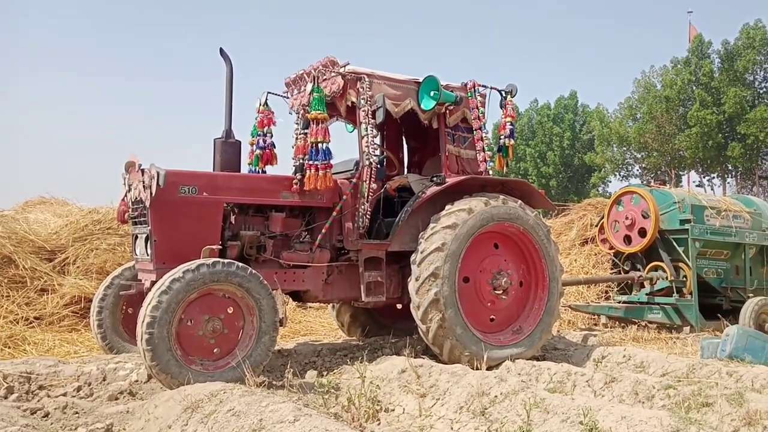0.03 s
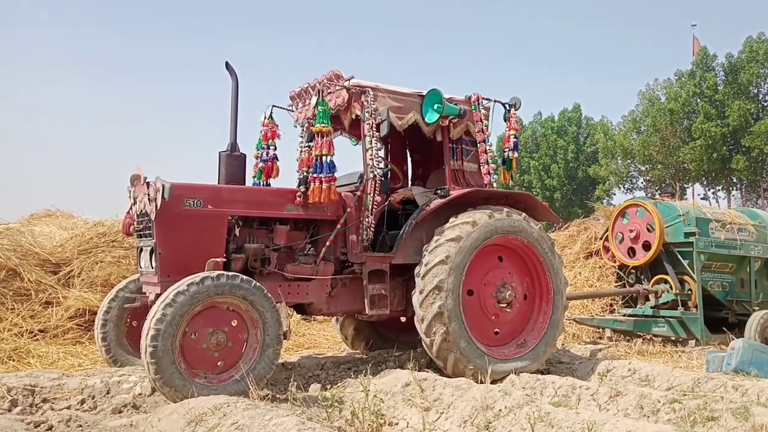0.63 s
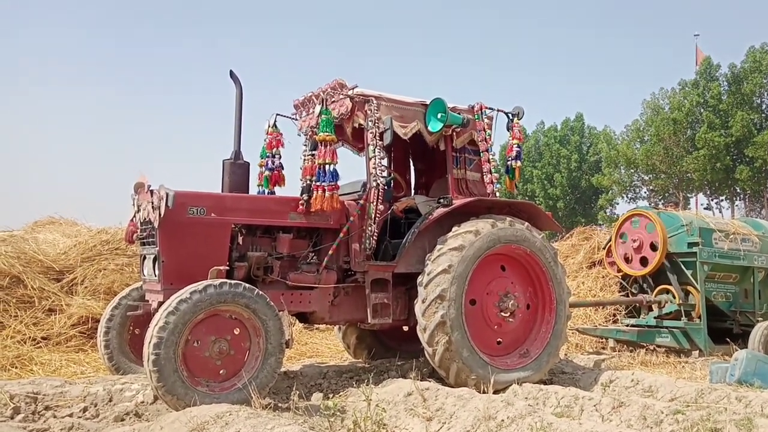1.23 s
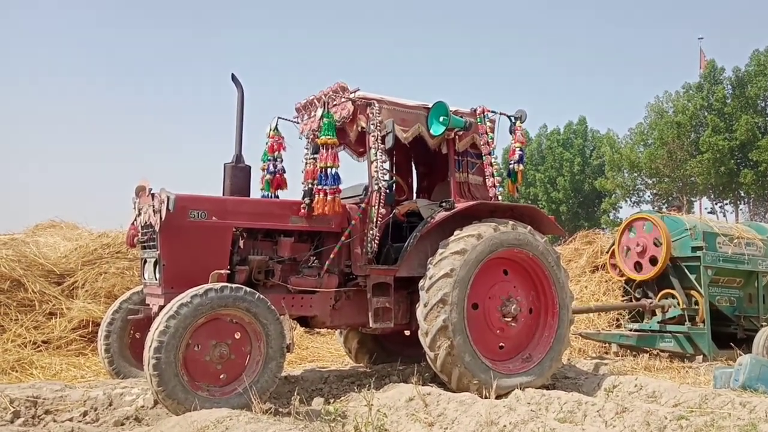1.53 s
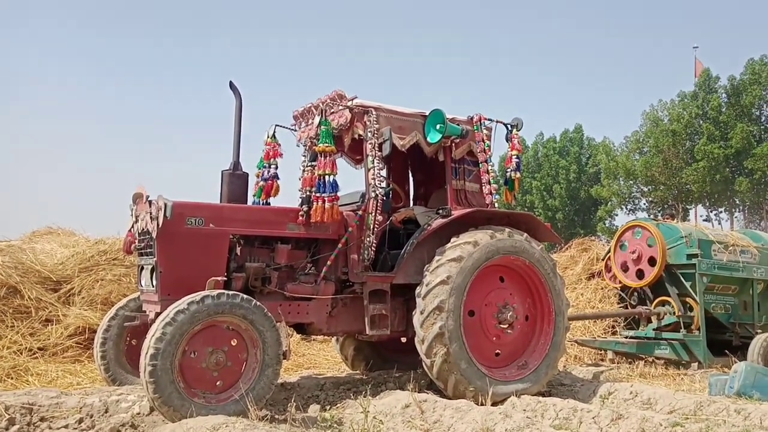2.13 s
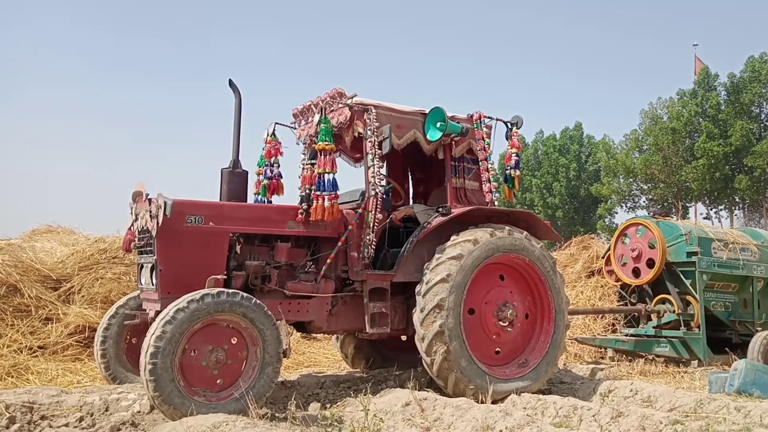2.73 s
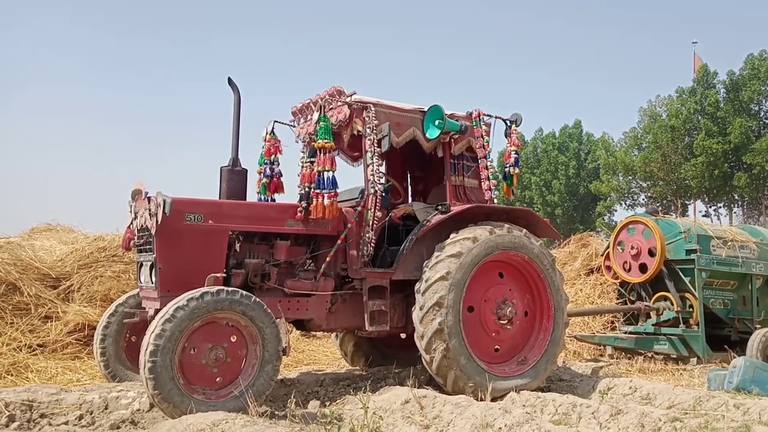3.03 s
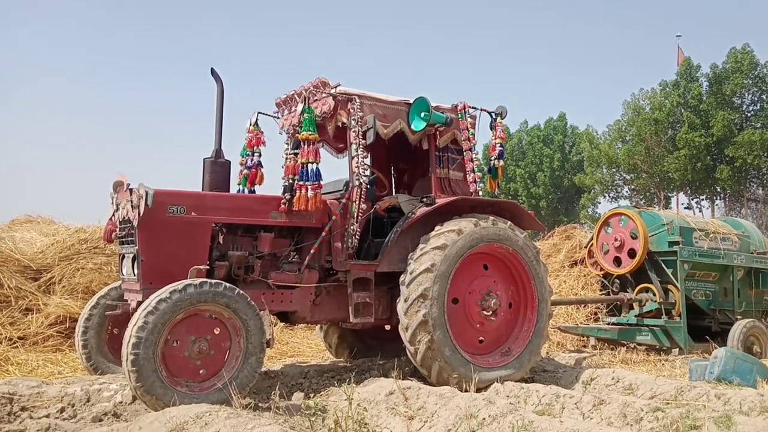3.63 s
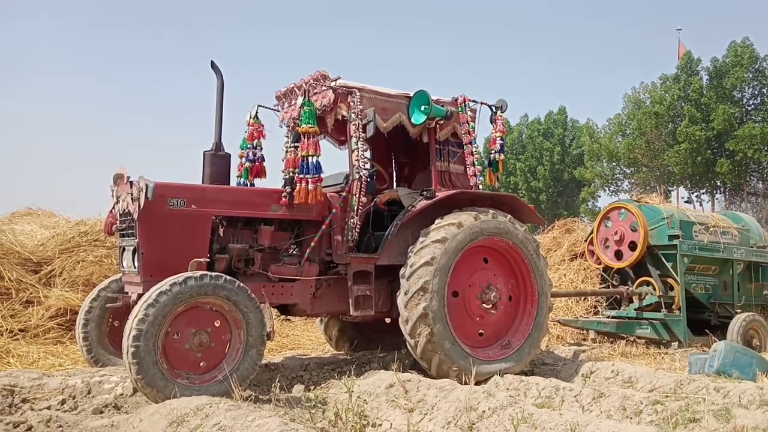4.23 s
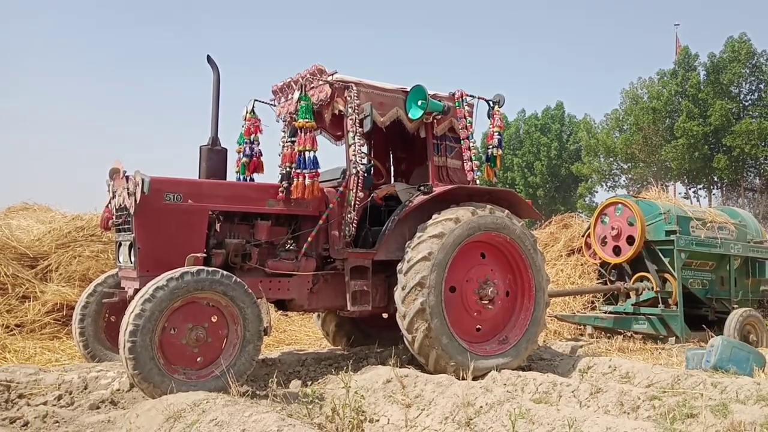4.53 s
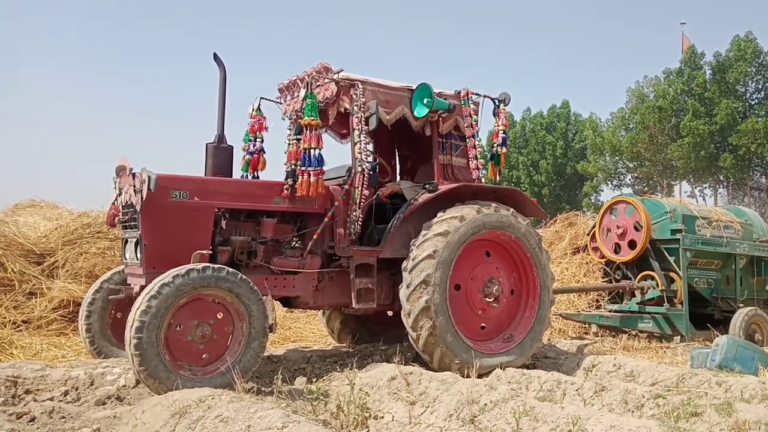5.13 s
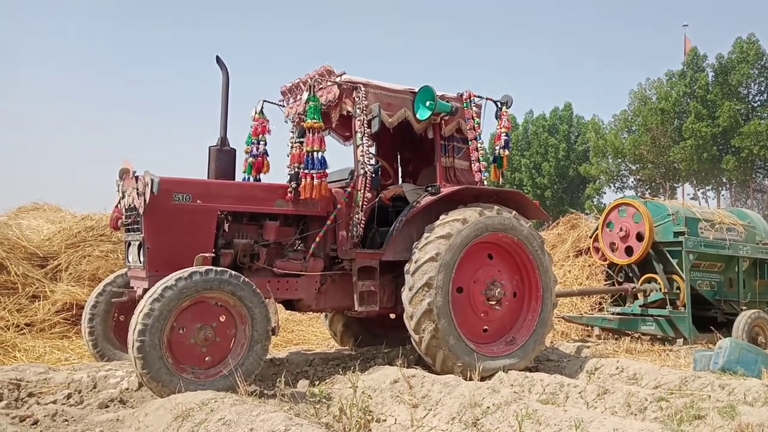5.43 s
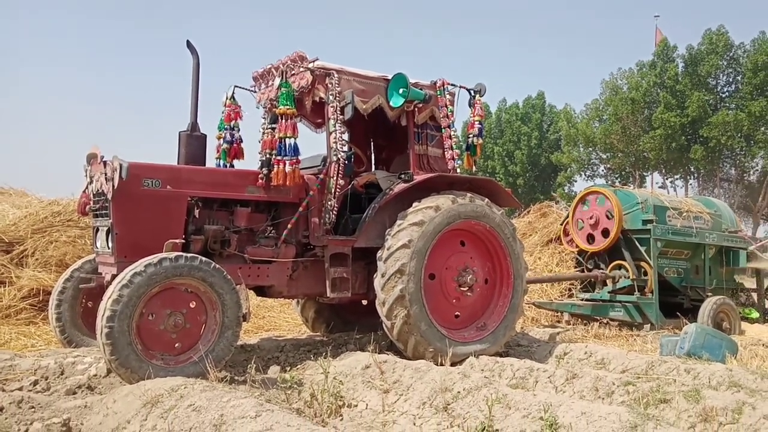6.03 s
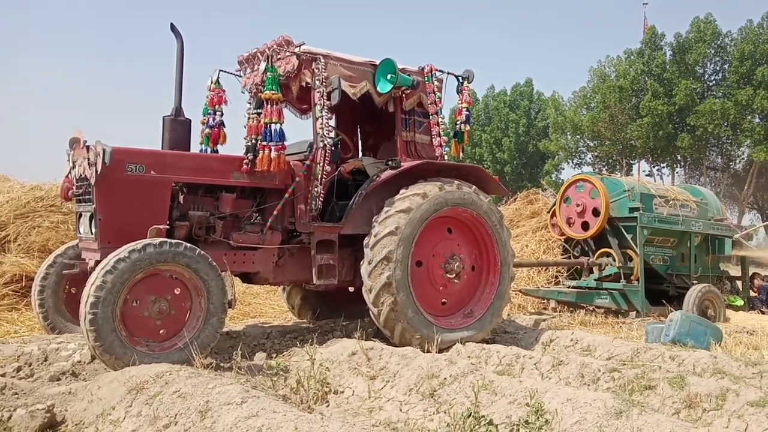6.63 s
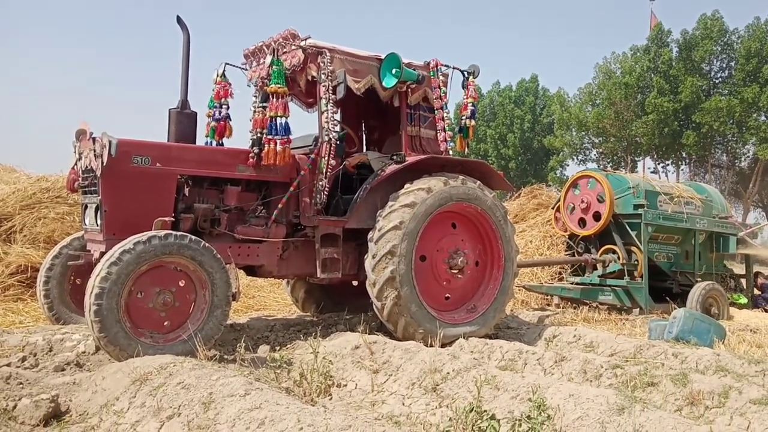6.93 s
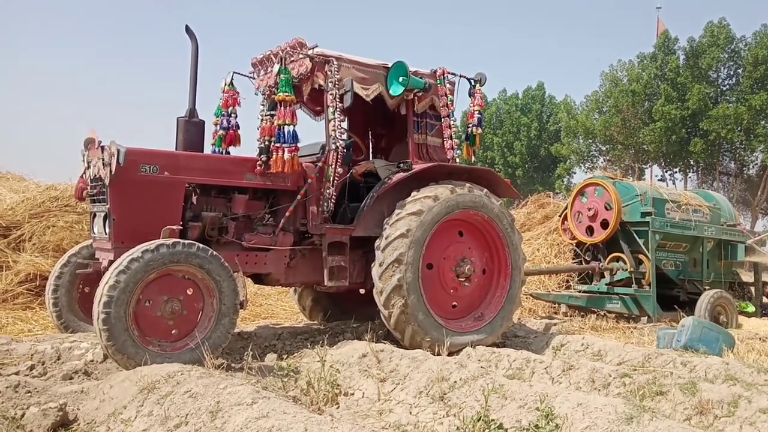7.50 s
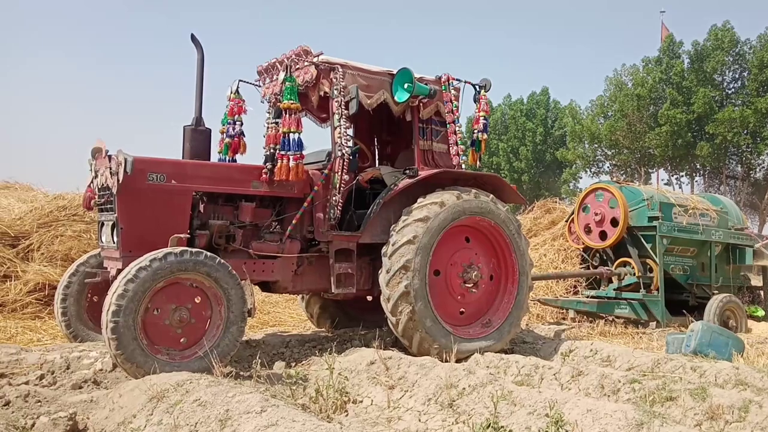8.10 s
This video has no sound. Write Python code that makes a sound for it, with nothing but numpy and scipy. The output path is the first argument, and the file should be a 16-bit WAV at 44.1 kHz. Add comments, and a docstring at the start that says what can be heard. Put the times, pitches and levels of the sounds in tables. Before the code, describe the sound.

A threshing machine roars with churning straw as the tractor engine powering it runs with a steady, throbbing drone and clatter.

```python
"""A parked tractor's four-cylinder diesel drives a threshing machine in an open field, a few metres away.
The exhaust drones, firings knock the block, pistons and valves clatter, and the gears whine, all from
one crankshaft whose speed sags and recovers with the load. The thresher roars with churned straw; its
drum and fans hum just off the engine's orders, so the bass throbs. Straw ticks against the casing."""
import sys
import numpy as np
from scipy import signal
from scipy.fft import rfft, irfft, next_fast_len
from scipy.io import wavfile

SR = 44100
rng = np.random.default_rng(int(sys.argv[2]) if len(sys.argv) > 2 else 0)


def pcm_store(signal):
    """Save signal as 16-bit PCM."""
    levels = np.round(np.clip(np.atleast_2d(signal), -1, 1) * 32767)
    wavfile.write(sys.argv[1], SR, levels.astype(np.int16).T)


N = 368676

# one row a cylinder: place/two-turn cycle, relative knock/dB, relative valve clatter/dB
CYLINDERS = [(.055, -4.5, -1), (.31, -7.5, -0.5), (.555, 1.5, -5.5), (.79, -1.5, 1.5)]


def crank_speed():
    """Turns per second: the load drags the engine down; belt and drive shaft tug on it once a lap."""
    # sag and recovery: t/s, speed/(turns/s)
    load_speed = [(0, 26.62), (0.78, 26.11), (1.17, 26.17), (2.4, 26.92), (2.7, 26.8), (2.98, 26.33),
                  (4.14, 25.83), (5.72, 26.74), (6.44, 26.75), (7.5, 26.05), (8.05, 26.09), (8.36, 26.25)]
    # belt and shaft warble: rate/(laps per crank turn), swing/(turns/s)
    tugs = [(.156, .075), (.331, .04)]
    speed = curve(load_speed)
    turns = np.cumsum(speed) / SR
    return speed + sum(swing * np.sin(2 * np.pi * laps * turns) for laps, swing in tugs)


def exhaust(turns, weak_orders=(8, 41), weak_db=-54.5):
    """The drone repeats every two crank turns; unequal cylinders add half orders that fill it out."""
    # prominent partials: order/crank speed, rms level/dB
    engine_tones = [(2, -37.6), (4, -32.1), (5, -49), (6, -40), (6.5, -50), (7, -51), (7.5, -49), (8, -45),
                    (8.5, -47), (9, -48), (10, -50), (10.5, -51), (11, -47), (11.5, -44), (12.5, -44.8),
                    (13, -51), (13.5, -46.6), (14.5, -40.7), (16, -51), (16.5, -44.8), (17, -49),
                    (17.5, -48), (19.5, -49), (20, -48), (22, -46.6), (23, -47.6), (25, -46.2), (25.5, -47),
                    (26, -48.8), (27, -43.9), (27.5, -47.6), (28, -50), (29, -48.6), (29.5, -48), (30, -50),
                    (31, -46.5), (32, -47.8), (32.5, -45.5), (34.5, -48), (35.5, -48.4), (36.5, -45.6),
                    (41.5, -50), (46, -48), (48.5, -46), (50.5, -46), (52.5, -47)]
    strong = dict(engine_tones)
    cycle = np.linspace(0, 2, 8192)
    shape = np.zeros(len(cycle))
    for order in sorted({*strong, *np.arange(*weak_orders, .5)}):
        phase = rng.random() * (order > 2 * len(CYLINDERS))  # low orders keep step with the firing
        peak = np.sqrt(2) * amp(strong.get(order, weak_db))
        shape += peak * np.cos(2 * np.pi * (order * cycle + phase))
    return np.interp(turns % 2, cycle, shape)


def pipe(turns, speed, order=6, top_db=-46):
    """The exhaust pipe booms a little when fast running lifts the third firing harmonic onto its pitch."""
    boom = tones(turns, [(order, top_db)], waver=.1, rate_hz=2)
    return boom * response(order * speed, hz=161.4, width_hz=2.2)


def knock(turns, level_db=-34, top_hz=3000):
    """Each firing strikes the engine block and leaves it ringing."""
    # block modes: f/Hz, width/Hz, relative level/dB
    modes = [(576, 49, -35), (880, 180, 1), (1281, 69, 14.5), (1358, 75, 3), (2350, 120, -14),
             (2520, 170, -18)]
    firings = sum(amp(db) * blows(turns, place) for place, db, _ in CYLINDERS)
    firings = signal.sosfilt(signal.butter(8, top_hz, fs=SR, output="sos"), firings)
    block = sum(amp(db) * ring(firings, hz, width, skirt=4) for hz, width, db in modes)
    return amp(level_db) * unit_rms(block)


def clacks(turns, gain_db=-2, top_hz=3200):
    """Pistons slap and valves seat at the same crank angles every cycle, each with its own short ring."""
    # metal hits: place/two-turn cycle, relative level/dB, f/Hz, width/Hz
    hits = [(.05, -40.5, 873, 350), (.11, -45.5, 2390, 452), (.135, -40.5, 1040, 450),
            (.29, -49, 2140, 450), (.315, -43, 1390, 400), (.545, -55, 2370, 450), (.565, -40.5, 1210, 550),
            (.795, -38.5, 1410, 350), (.855, -45.5, 2885, 350), (.895, -47, 1765, 400)]
    metal = sum(amp(db) * ring(blows(turns, place), hz, width) for place, db, hz, width in hits)
    return amp(gain_db) * signal.sosfilt(signal.butter(14, top_hz, fs=SR, output="sos"), metal)


def rattle_envelope(turns, rise_cycles=.11, fall_cycles=.18):
    """Rattling swells around each firing and falls away towards the next."""
    envelope = np.zeros(N)
    for place, _, db in CYLINDERS:
        age = (turns / 2 - place + rise_cycles / 2) % 1
        attack = 1 - np.exp(-(age / rise_cycles) ** 2)
        envelope += amp(db) * attack * np.exp(-age / fall_cycles)
    return unit_rms(envelope)


def clatter(turns, rattle, locked_db=-7, steady_db=2, grain_db=1.0, accent_db=1.13):
    """Valve gear and injectors: partly the same grit each cycle, partly loose rattle."""
    # clatter colour: f/Hz, density/(dB per Hz)
    spectrum = [(500, -84), (1100, -72), (1330, -56.5), (1550, -69.5), (1850, -70.5), (2300, -64.5),
                (2900, -69.5), (3300, -76.5), (3700, -87.5), (4200, -95), (4800, -108), (8000, -130)]
    locked = cycle_noise(turns, points=1024)
    accents = amp(accent_db * cycle_noise(turns, points=48))
    loose = rng.standard_normal(N) * amp(grain_db * drift(rate_hz=140))
    grit = amp(locked_db) * locked + unit_rms(loose)
    return coloured(unit_rms(grit * (amp(steady_db) + rattle) * accents), spectrum)


def gears(turns, speed):
    """Meshing teeth sing loudest where their pitch meets a resonance of the housing."""
    # gear tones: order/crank speed, rms level on resonance/dB, resonance f/Hz, width/Hz
    meshes = [(18, -39, 466, 9), (21, -36, 563, 20), (42, -33.3, 1125, 65), (84, -44.5, 2220, 100)]
    return sum(tones(turns, [(order, db)], waver=.22, rate_hz=5.3) * response(order * speed, hz, width)
               for order, db, hz, width in meshes)


def whine(turns, teeth_per_turn=147):
    """One thin, high gear tone swells and fades, warbling with the drive."""
    # whine fader: t/s, rms level/dB
    fader = [(0, -68), (.45, -58.5), (1.2, -56), (1.75, -65), (2.0, -58), (2.45, -67), (3.1, -59),
             (3.55, -61), (4.0, -69), (4.42, -70), (4.62, -60), (5.0, -59.5), (5.35, -68), (5.7, -65),
             (6.7, -72), (7.0, -62), (7.7, -68), (8.3, -61.5)]
    return amp(curve(fader)) * tones(turns, [(teeth_per_turn, 0)], waver=.27, rate_hz=18)


def drum(turns, drum_per_crank=.49433):
    """The thresher drum hums at just under half the crank speed, beating slowly against the exhaust."""
    # drum partials: order/drum speed, rms level/dB
    partials = [(4, -45), (6, -54), (8, -33.4), (9, -53), (12, -43), (14, -54), (16, -44.5), (17, -53),
                (18, -51), (19, -52), (22, -49), (24, -53)]
    return tones(drum_per_crank * turns, partials, waver=.18, rate_hz=1.5)


def thresher(turns, pulley_per_crank=1.553, gust_db=.5):
    """Fans hum and a belt-driven pulley buzzes over the roar of air and straw in a hollow casing."""
    # churned air and straw: f/Hz, density/(dB per Hz)
    churn = [(20, -96), (42, -78), (70, -64), (100, -58.5), (145, -57), (190, -59), (280, -57.5),
             (430, -60.5), (560, -56), (620, -59), (690, -56.5), (740, -58.5), (1060, -61.5), (1450, -61),
             (2000, -69), (4000, -110), (8000, -135)]
    # casing resonances: f/Hz, width/Hz, rms level/dB
    casing = [(839, 35, -37.5), (878.5, 31, -39), (927, 102, -35.5)]
    # fan hum: order/crank speed, rms level/dB
    fan_tones = [(4.935, -33.2), (5.194, -40.5), (7.792, -38.5), (9.87, -45), (10.388, -49), (33.16, -47)]
    # pulley buzz: order/pulley speed, rms level/dB
    pulley_tones = [(8, -53), (12, -49), (13, -48), (14, -52), (16, -50), (17, -49), (20, -40.5), (21, -39),
                    (22, -46), (23, -48)]
    roar = coloured(rng.standard_normal(N), churn)
    for hz, width, db in casing:
        roar += amp(db) * ring(rng.standard_normal(N), hz, width, skirt=2)
    fans = tones(turns, fan_tones, waver=.12, rate_hz=2)
    pulley = tones(pulley_per_crank * turns, pulley_tones, waver=.2, rate_hz=2)
    return roar * amp(gust_db * drift(rate_hz=49)) + fans + pulley


def straw(gain_db=-2, decay_s=.0045):
    """Bits of straw and grain tick against sheet metal: narrow bands ping, wide ones snap."""
    # the loudest ticks: t/s, relative level/dB, f/Hz, width/Hz
    loud_ticks = [(.768, -52, 7430, 900), (.92, -52, 7900, 900), (1.25, -46.5, 10000, 500),
                  (1.491, -52, 9500, 3000), (1.715, -46.5, 9850, 500), (2.182, -50, 9310, 700),
                  (2.484, -51, 9770, 900), (2.595, -52, 10800, 1500), (2.856, -49, 9200, 4000),
                  (2.946, -47.5, 10200, 600), (3.096, -46, 10100, 500), (3.194, -45, 9000, 4500),
                  (3.411, -52, 10000, 1000), (3.535, -51, 9000, 3000), (3.887, -51, 9900, 800),
                  (4.0, -45, 8490, 1500), (4.931, -48.5, 9800, 4000), (5.058, -49.5, 8700, 3000),
                  (5.51, -51, 9900, 900), (6.185, -51, 9500, 3000), (6.633, -52, 10500, 1500),
                  (7.307, -47, 9830, 600), (7.434, -51, 8700, 2500)]
    out = np.zeros(N)
    t = np.arange(SR // 20) / SR
    for s, db, hz, width in loud_ticks + faint_ticks():
        band = ring(rng.standard_normal(len(t)), hz, width)
        tick = amp(db + gain_db) * band * np.exp(-t / decay_s)
        slot = out[round(s * SR):][:len(t)]
        slot += tick[:len(slot)]
    return out


def faint_ticks(per_s=9, relative_db=-55, spread_db=3):
    """Fainter bits land at random, from dull snaps to narrow pings: more tick rows for straw()."""
    gap, size, ping = rng.random((200, 3)).T
    times = np.cumsum(-np.log(1 - gap)) / per_s
    levels = relative_db + spread_db * (2 * size - 1)
    hz = np.interp(ping, [0, 1], [8000, 10500])
    width_hz = np.interp(ping, [0, 1], [2000, 400])
    return [row for row in zip(times, levels, hz, width_hz) if row[0] < N / SR]


def hiss(rattle, steady=.94, flicker_db=.7):
    """A faint dry hiss pulses with the engine."""
    # hiss colour: f/Hz, density/(dB per Hz)
    spectrum = [(3000, -110), (4800, -104), (5500, -97), (6300, -105), (7100, -96), (7700, -103),
                (8250, -97.5), (9000, -99.5), (10000, -96), (11100, -98), (12400, -104.5), (12800, -109.5),
                (13500, -110), (14200, -113), (15700, -116)]
    pulsing = rng.standard_normal(N) * (steady + rattle)
    flicker = amp(flicker_db * drift(rate_hz=15))
    return coloured(unit_rms(pulsing * flicker), spectrum)


def blows(turns, place, uneven_db=1.5, jitter_s=.00005):
    """One impulse every two-turn cycle, scattered a little in strength and timing."""
    due = np.interp(np.arange(place, turns[-1] / 2, 1), turns / 2, np.arange(N))
    late, strength = rng.standard_normal((len(due), 2)).T
    onsets = np.clip(due + late * jitter_s * SR, 0, N - 1).astype(int)
    out = np.zeros(N)
    out[onsets] = amp(uneven_db * strength)
    return out


def cycle_noise(turns, points):
    """A random pattern of rms 1 that loops every two crank turns."""
    pattern = rng.standard_normal(points)
    return unit_rms(np.interp(turns / 2 % 1, np.linspace(0, 1, points), pattern))


def tones(turns, rows, waver, rate_hz):
    """Sines locked to a shaft, each wavering a little in strength and phase."""
    out = np.zeros(N)
    for order, db in rows:
        angle = 2 * np.pi * order * turns
        strength = 1 + waver * drift(rate_hz)
        slip = waver * drift(rate_hz)
        out += amp(db) * (strength * np.cos(angle) + slip * np.sin(angle))
    return np.sqrt(2) * out


def ring(x, hz, width_hz, skirt=1):
    """Rings x through two resonators in series, the second skirt times as wide; rms 1."""
    for width in (width_hz, skirt * width_hz):
        x = signal.lfilter(*signal.iirpeak(hz, hz / width, fs=SR), x)
    return unit_rms(x)


def response(pitch_hz, hz, width_hz):
    """Gain of a resonance for a tone that glides past it."""
    return 1 / np.sqrt(1 + (2 * (pitch_hz - hz) / width_hz) ** 2)


def coloured(x, spectrum):
    """Gives a white sound of rms 1 a spectrum in dB per Hz."""
    hz, db = np.transpose(spectrum)
    size = next_fast_len(N + 4096)
    bins_hz = np.fft.rfftfreq(size, 1 / SR)
    gain = amp(np.interp(np.log(bins_hz + 1), np.log(hz), db))
    return irfft(rfft(x, size) * gain, size)[:N] * np.sqrt(SR / 2)


def drift(rate_hz, points=2048):
    """Random wandering of rms 1, mostly slower than rate_hz."""
    hz = np.fft.rfftfreq(points, N / SR / points)
    slow = irfft(rfft(rng.standard_normal(points)) / (1 + (hz / rate_hz) ** 2))
    return unit_rms(np.interp(np.linspace(0, points - 1, N), np.arange(points), slow))


def curve(rows):
    """Joins (t/s, value) rows by straight lines."""
    return np.interp(np.arange(N) / SR, *np.transpose(rows))


def amp(db):
    """Decibels to gain."""
    return 10 ** (np.asarray(db) / 20)


def unit_rms(x):
    """Scales to rms 1."""
    return x / np.sqrt(np.mean(x ** 2) + 1e-20)


def scene(opposed_s=3.75):
    """One crankshaft drives engine and thresher, mixed in mono."""
    # fader on clatter and hiss: t/s, gain/dB
    treble_fader = [(0, -1.5), (.9, 0.7), (2.4, 0.5), (3.0, 1.3), (3.7, 0), (8.36, -0.1)]
    speed = crank_speed()
    turns = np.cumsum(speed) / SR
    # drum and exhaust are in antiphase at opposed_s, one trough of the bass throb
    since_opposed = turns - turns[round(opposed_s * SR)]
    drone = -drum(since_opposed) + exhaust(since_opposed) + pipe(since_opposed, speed)
    rattle = rattle_envelope(turns)
    treble = amp(curve(treble_fader)) * (clatter(turns, rattle) + hiss(rattle))
    engine = knock(turns) + clacks(turns) + gears(turns, speed) + whine(turns) + treble
    return (drone + engine + thresher(turns) + straw())[None]


def record(dry, top_hz=15750):
    """Very short fades at both ends, then a steep high cut."""
    faded = dry * signal.windows.tukey(N, .001)
    high_cut = signal.firwin(511, top_hz, window=("kaiser", 9), fs=SR)
    return signal.oaconvolve(faded, high_cut[None], "same")


dry = scene()
out = record(dry)
pcm_store(out)
```